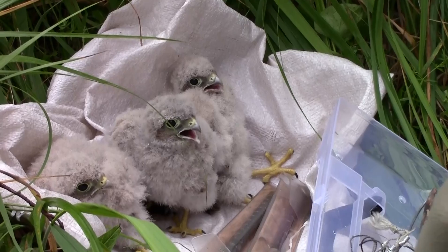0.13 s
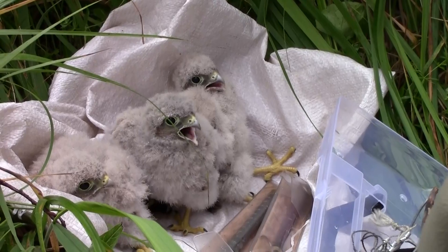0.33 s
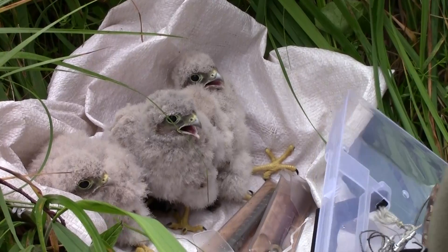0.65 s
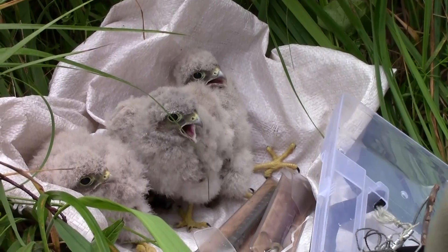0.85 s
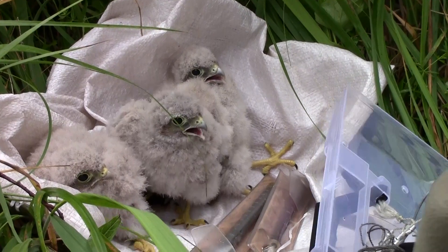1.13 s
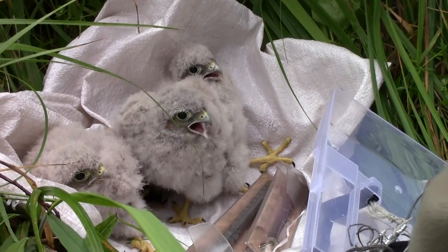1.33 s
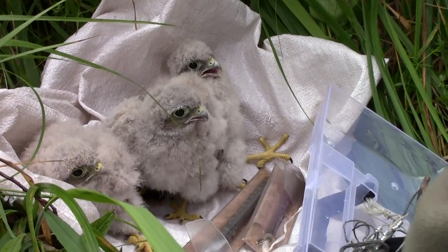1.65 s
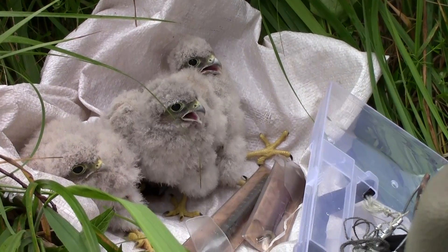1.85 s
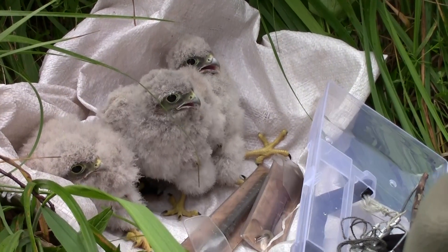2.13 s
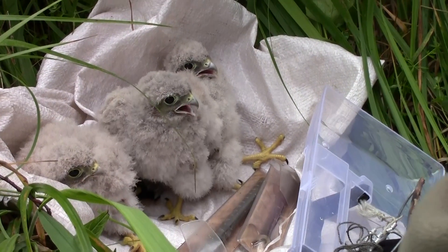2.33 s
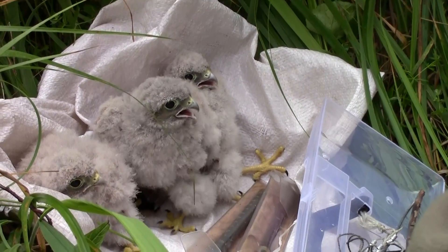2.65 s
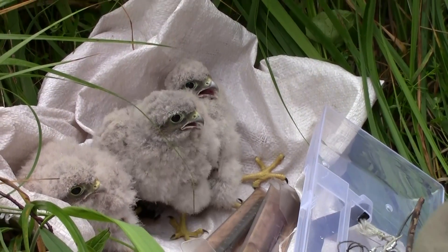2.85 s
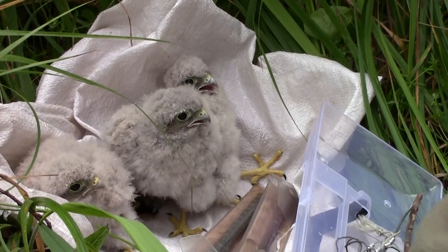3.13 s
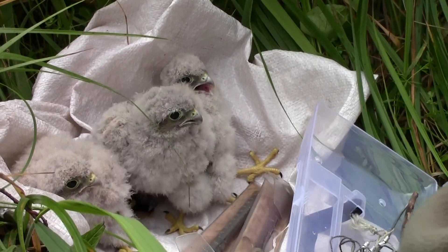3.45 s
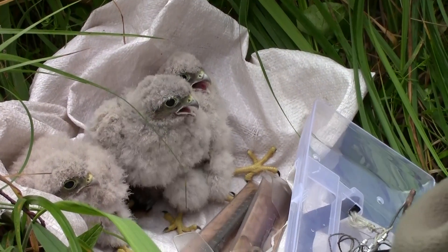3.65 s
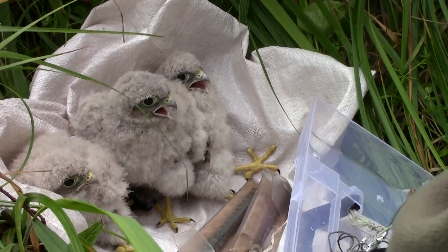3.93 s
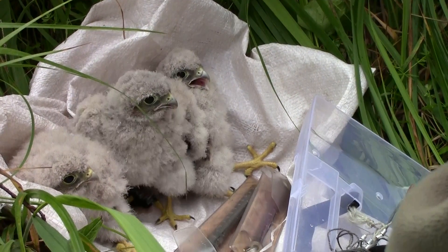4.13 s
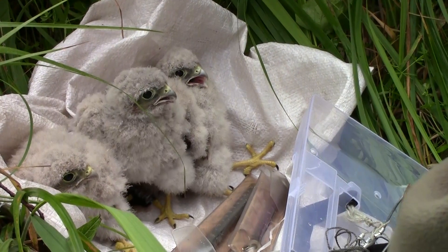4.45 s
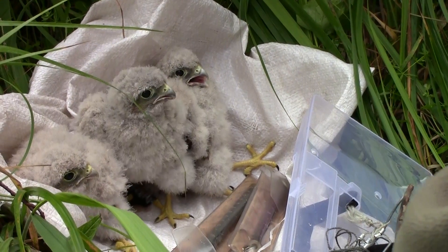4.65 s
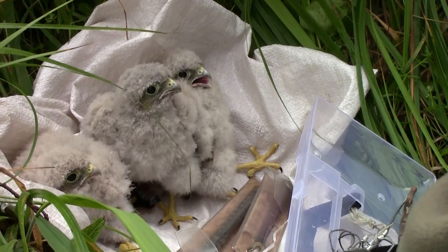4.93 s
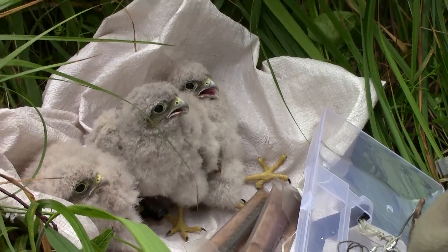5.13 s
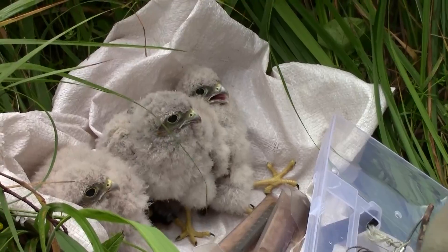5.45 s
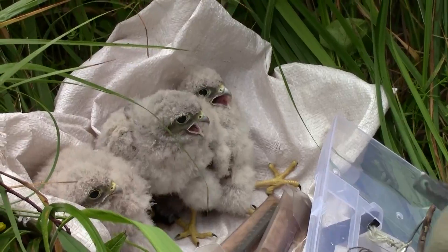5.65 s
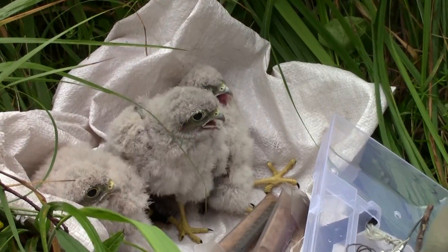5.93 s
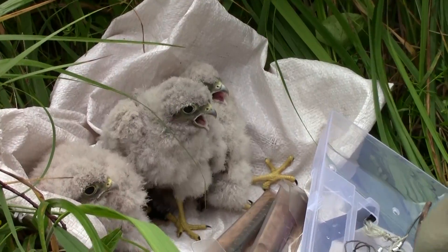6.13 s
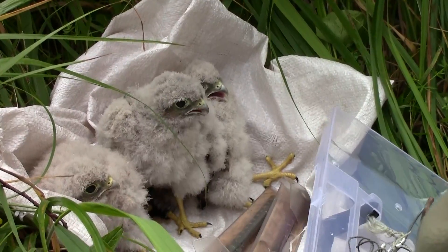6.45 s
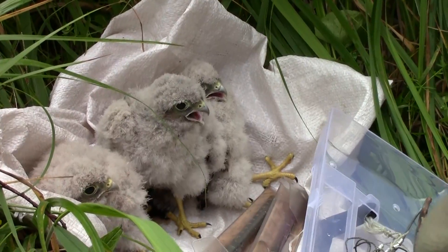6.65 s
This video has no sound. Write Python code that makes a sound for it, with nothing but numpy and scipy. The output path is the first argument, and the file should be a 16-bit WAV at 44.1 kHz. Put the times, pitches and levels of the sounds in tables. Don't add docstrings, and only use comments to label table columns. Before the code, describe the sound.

Outdoors in grass, heard close in stereo, a falcon chick screams from about 0.15 s to the end, roughly four times a second. Each shriek lasts about a tenth of a second: a clear swelling start, a rough cracked middle, a loud bright leap near 2 kHz with strong overtones, then a quick collapse. A second chick cries more softly and huskily between 0.3 and 0.95 s, again from 4.2 to 5.55 s, and faintly near 6.1 s. Light plastic ticks and scrapes occur around 0.7-0.9 and 2.5 s, a firm knock at 3.2 s, a duller bump at 3.5 s, and the busiest clatter at 5.6-5.9 s. Small metal rings clink at 2.6 s, brightly at 4.0-4.3 s, and at 5.6-5.85 s, with fine chain hiss over cloth. Distant traffic hum and light low wind continue, gusting slightly around 5.1 s; a faint engine drone enters near 5.9 s.

```python
import sys
import numpy as np
from scipy import signal
from scipy.io import wavfile
from scipy.ndimage import uniform_filter1d

SR = 44100
rng = np.random.default_rng(int(sys.argv[2]) if len(sys.argv) > 2 else 0)


def to_wav(sig):
    pcm = np.clip(np.atleast_2d(sig), -1, 1) * 32767
    pcm = np.round(pcm).astype(np.int16)
    wavfile.write(sys.argv[1], SR, pcm.T)


def volts_from_decibels(level):
    exponent = np.asarray(level, float) / 20
    return 10 ** exponent


N = 299880
TIME = np.arange(N) / SR
LEFT_RIGHT = np.array([[1], [-1]])


def band(x, lo_hz, hi_hz, order=2):
    return signal.sosfilt(signal.butter(order, [lo_hz, min(hi_hz, .49 * SR)], "band", fs=SR, output="sos"), x)


def unit(x):
    return x / np.sqrt(np.mean(x ** 2))


def walk(rate_hz):
    return unit(signal.sosfilt(signal.butter(2, rate_hz, fs=SR, output="sos"), rng.standard_normal(N)))


def colour_db(table, hz):
    f, db = np.transpose(table)
    return np.interp(np.log(hz), np.log(f), db)


def arch(t0, t1, first, top, last, order=(10, 7), count=17):
    u = np.linspace(0, 1, count)
    return t0 + u * (t1 - t0), top + (first - top) * (1 - u) ** order[0] + (last - top) * u ** order[1]


def controls(points, smooth_s):
    s, *columns = np.transpose(points)
    return [uniform_filter1d(np.interp(TIME, s, c), int(smooth_s * SR)) for c in columns]


def ring(hz, db, t60_s, t):
    return volts_from_decibels(db - 60 * t / t60_s) * np.sin(2 * np.pi * hz * t)


def add(out, s, x):
    i = int(s * SR)
    out[i:i + len(x)] += x[:N - i]


def chick():
    # start_s, crack_s, reached_hz, reached_db
    heads = [(0.147, 0.172, 1697, -12), (0.396, 0.422, 1686, -11.5), (0.646, 0.687, 1704, -9.5),
             (0.887, 0.916, 1836, -5), (1.124, 1.147, 1788, -8.5), (1.36, 1.384, 1757, -10),
             (1.593, 1.617, 1824, -7), (1.833, 1.853, 1657, -15), (2.086, 2.107, 1825, -8),
             (2.332, 2.353, 1787, -12), (2.57, 2.598, 1768, -10), (2.784, 2.806, 1883, -5),
             (3.029, 3.049, 1652, -14.5), (3.305, 3.339, 1860, -7), (3.574, 3.602, 1792, -11),
             (3.799, 3.814, 1835, -14.5), (4.025, 4.062, 1885, -5.5), (4.301, 4.349, 1810, -6),
             (4.571, 4.611, 1797, -7.5), (4.826, 4.874, 1865, -5.5), (5.078, 5.099, 1845, -6),
             (5.319, 5.354, 1790, -8), (5.625, 5.672, 2040, -3.5), (5.877, 5.938, 2112, -3),
             (6.148, 6.174, 1825, -8.5), (6.389, 6.411, 1817, -12.5), (6.675, 6.723, 1750, -11)]
    # landing_hz, landing_db, before_leap_hz, before_leap_db
    cracks = [(1665, -14, 1780, -8), (1606, -16.5, 1770, -7.5), (1663, -11.5, 1735, -8),
              (1698, -15.5, 1820, -8.5), (1657, -16.5, 1800, -6.5), (1690, -15, 1815, -6.5),
              (1695, -15.5, 1810, -9), (1660, -16.5, 1880, -7), (1689, -15, 1795, -10),
              (1670, -16.5, 1810, -8), (1710, -15.5, 1785, -12), (1620, -16, 1725, -13.5),
              (1555, -19.5, 1805, -9), (1735, -14, 1725, -11.5), (1680, -14, 1825, -10.5),
              (1750, -17, 1825, -11.5), (1778, -13, 1775, -13), (1675, -14, 1785, -12.5),
              (1618, -15, 1695, -15), (1790, -10.5, 1800, -9), (1845, -4, 2045, -5.5),
              (1637, -15.5, 1600, -11), (1847, -16, 1960, -11), (1928, -11, 1700, -9),
              (1670, -16.5, 1800, -11.5), (1597, -17, 1795, -13), (1695, -16.5, 1705, -16)]
    # start_s, end_s, top_hz, crack_half_pitch_db
    crowns = [(0.193, .232, 1999, -13.5), (0.45, 0.481, 2000, -10), (0.704, 0.733, 1957, -18),
              (0.944, 0.982, 2121, -6.5), (1.177, 1.208, 2042, -10.5), (1.415, 1.443, 2117, -10.5),
              (1.638, 1.68, 2097, -10), (1.887, 1.923, 2143, -10), (2.143, 2.177, 2105, -8),
              (2.382, 2.411, 2069, -8), (2.611, 2.652, 2070, -6), (2.827, 2.876, 2140, -5.5),
              (3.084, 3.121, 2090, -13), (3.361, 3.406, 2117, -7), (3.628, 3.662, 2080, -7.5),
              (3.851, 3.891, 2165, -11), (4.072, 4.118, 2143, -11), (4.37, 4.402, 2021, -6),
              (4.627, 4.669, 2035, -4), (4.884, 4.926, 2098, -16), (5.136, 5.165, 2065, -45),
              (5.37, 5.409, 2047, -7.5), (5.687, 5.716, 2190, -19), (5.944, 5.971, 2111, -21),
              (6.212, 6.247, 2131, -9), (6.433, 6.478, 2113, -4.5), (6.734, 6.763, 1990, -3.5)]
    # onset_hz, onset_db, crown_db, beak_treble_db
    effort = [(1603, -16, -7, -2.5), (1670, -13.5, -6.5, -3), (1595, -17, -6, -5), (1840, -12, -6.5, 0.5),
              (1745, -13.5, -7, -3.5), (1730, -13.5, -7, -3.5), (1775, -11, -6.5, -3),
              (1630, -18, -6, -2.5), (1797, -11.5, -6, -2.5), (1760, -13, -6, -5), (1750, -15, -6, -5),
              (1860, -12.5, -6, -1.5), (1636, -15.5, -6, -4.5), (1750, -15.5, -6, -2),
              (1765, -14.5, -6, -5), (1765, -16, -7, 0), (1840, -11, -6.5, -2), (1750, -17, -6, -5.5),
              (1785, -14.5, -6, -4.5), (1720, -18, -6, -3), (1790, -11.5, -6, -4.5), (1740, -16, -6, -4.5),
              (1775, -16, -8, -0.5), (1735, -19, -7, -2), (1805, -12, -6.5, -2), (1795, -13.5, -6.5, -2.5),
              (1705, -19.5, -6.5, -4)]
    # partial_hz, level_db
    throat = [(800, -23.5), (1700, -16.5), (2100, -15.5), (2700, -16.5), (3400, 1), (4350, 0.5),
              (4750, -12), (5200, -10.5), (6300, -19), (7300, -14), (8400, -9), (10500, -21.5),
              (12500, -30), (14600, -35), (17000, -78)]
    leap_hz, droop, crack_rough = 189.8, 0.94, 1.35
    rows = []  # s, hz, db, half_db, rough, dull_db, air_db
    for head, crown, middle, push in zip(heads, crowns, cracks, effort):
        start, crack_s, head_hz, head_db = head
        t0, t1, top_hz, half_db = crown
        land_hz, land_db, leave_hz, leave_db = middle
        onset_hz, onset_db, crown_db, beak_db = push
        crack = np.clip((half_db + 30) / 22, .2, 1.2)
        fall = np.clip((half_db + 30) / 18, 0, 1)
        end_hz = droop * top_hz
        rows += [
            (start - .001, .88 * onset_hz, -75, -30, .6, -22, -20),
            (start + 0.00101, .92 * onset_hz, onset_db - 13, -30, .6, -22, -20),
            (start + .004, .975 * onset_hz, onset_db - 4, -26, .6, -20, -24),
            (start + .009, onset_hz, onset_db, -24, .55, 0.77 * onset_db + beak_db, -25),
            (start + .55 * (crack_s - start), .1 * onset_hz + .9 * head_hz, head_db - 1.2, -23, .55,
             1.1 * head_db + beak_db, -27),
            (crack_s - .003, head_hz, head_db, -22, .4, 1.8 * head_db + beak_db, -27)]
        rows += [
            (crack_s, .98 * land_hz, land_db - 3 * crack, half_db + 2, crack, -14, -26 + 11 * crack),
            (crack_s + .003, land_hz, land_db, half_db + 2, crack_rough * fall, -12, -30 + 11 * crack),
            (.4 * crack_s + .6 * t0, .62 * land_hz + .38 * leave_hz, .5 * (land_db + leave_db), half_db + 2,
             crack_rough * fall, -11, -30 + 12 * crack),
            (t0 - .001, leave_hz, leave_db, half_db, crack, -9, -30 + 12 * crack)]
        first_hz = min(leave_hz + leap_hz, top_hz)
        times, pitch = arch(t0 + .0017, t1, first_hz, top_hz, end_hz, order=(11, 10))
        for s, hz in zip(times, pitch):
            rows.append((s, hz, crown_db + 0.49, -30, .4, beak_db + 2.13 - 90 * (1 - hz / top_hz), -27))
        rows += [
            (t1 + .002, .95 * end_hz, crown_db - 9, -12, 1.8, -18, -15),
            (t1 + .012, .76 * end_hz, crown_db - 17, -8, 2.2, -22, -11),
            (t1 + .022, .56 * end_hz, -75, -11, 2.2, -22, -11)]
    hz, db, half_db, rough, dull_db, air_db = controls(sorted(rows), .0018)
    return syrinx(hz, db, half_db, rough, throat, dull_db, air_db)


def mate():
    # start_s, end_s, top_hz, level_db
    calls = [(0.314, 0.409, 2020, -17.5), (.495, 0.565, 2007, -19.5), (0.848, 0.949, 2036, -18.5),
             (4.175, 4.286, 2027, -17), (4.483, 4.583, 2205, -26.5), (4.677, 4.749, 2153, -25),
             (4.994, 5.083, 2072, -20.5), (5.162, 5.241, 2140, -26.5), (5.289, 5.366, 1965, -26),
             (5.464, 5.553, 2166, -25.5), (6.098, 6.22, 2168, -28.5)]
    # partial_hz, level_db
    mate_throat = [(1500, -29.5), (2200, -7), (3200, 0), (4200, 3), (5500, -14.5), (8000, -14),
                   (10500, -20), (12000, -34), (17000, -52)]
    rows = []  # s, hz, db, dull_db
    for t0, t1, top_hz, call_db in calls:
        first_hz, last_hz = .8 * top_hz, .82 * top_hz
        times, pitch = arch(t0, t1, first_hz, top_hz, last_hz, order=(4, 6))
        swell_db = arch(t0, t1, -20.0, 0.86, -19, order=(2, 4))[1]
        rows.append((t0 - .01, first_hz, -75, 0))
        for s, hz, db in zip(times, pitch, call_db + swell_db):
            rows.append((s, hz, db, 1.4 * (call_db + 17.5) + 0.5 * (db - call_db)))
        rows.append((t1 + 0.01296, last_hz - 120, -75, -12))
    hz, db, dull_db = controls(rows, .003)
    rough = 0.8 - 0.22 * dull_db.clip(-9, 0)
    return syrinx(hz, db, 0 * hz - 27, rough, mate_throat, dull_db, -22.5 - 0.49 * dull_db)


def syrinx(hz, db, half_db, rough, throat, dull_db, air_db, jitter=0.00815, shimmer_db=1.5):
    on = db > -70
    wander = 1 + jitter * rough * walk(481) + 0.00304 * walk(49.3)
    half_phase = (np.pi * np.cumsum(hz * wander) / SR)[on]
    wobble_db, tone = shimmer_db * walk(178), np.zeros(N)
    patch_db = 3.1 * walk(55)
    for k in range(1, 19):
        part_hz = hz[on] * k / 2
        part_db = colour_db(throat, part_hz) + (half_db[on] if k % 2 else 0)
        least = 0.45 * (k == 6) * (half_db[on] < -19)
        part_db += dull_db[on] * np.clip(part_hz / 4000 - 1.2, least, 1.3)
        part_db += (rough * np.roll(wobble_db, 999 * k) + (k > 4) * np.roll(patch_db, 7919 * k))[on]
        tone[on] += volts_from_decibels(part_db) * (part_hz < 17000) * np.sin(k * half_phase + rng.uniform(0, 2 * np.pi))
    noise = rng.standard_normal(N)
    air = unit(band(noise, 3560, 5080)) + volts_from_decibels(-5.5) * unit(band(noise, 5500, 8000))
    air += volts_from_decibels(-5.5 + 4.5 * walk(71)) * unit(band(noise, 8900, 9910))
    air += volts_from_decibels(-39) * unit(band(noise, 460, 4200)) + volts_from_decibels(-17.5) * unit(band(noise, 7000, 15800))
    return volts_from_decibels(db) * on * (np.sqrt(2) * tone + volts_from_decibels(air_db + 4.3 * walk(63)) * air)


def box():
    # start_s, level_db, pitch_hz
    thuds = [(.204, -22, 1090), (0.826, -19.5, 800), (.861, -18, 850), (1.271, -30, 596),
             (1.951, -29, 1063), (2.732, -18.5, 1473), (3.164, -2.5, 952), (3.484, -15.5, 239.8),
             (3.485, -13.5, 602), (3.497, -22, 1100), (3.515, -20, 1297), (3.506, -14.5, 863),
             (5.606, -14, 1102), (5.656, -8.5, 904), (5.671, 0.5, 546), (5.746, -6, 554),
             (5.787, -11.5, 757), (5.797, -9, 815), (5.813, .5, 689), (5.853, -12.5, 872),
             (5.875, -7.5, 532), (6.058, -29.5, 932), (6.315, -20.5, 628), (6.347, -22.5, 543)]
    # start_s, level_db, pitch_hz
    clacks = [(.048, -31, 690), (0.686, -20.5, 537), (.915, -28, 903), (1.048, -26, 544),
              (2.2135, -15, 2900), (2.214, -19, 1500), (2.501, -16.5, 1468), (2.522, -15, 1405),
              (2.556, -29, 740), (2.606, -24.5, 691), (3.181, -10, 952), (3.196, -23, 942),
              (3.21, -17, 963), (3.224, -33, 950), (3.24, -17, 950), (3.244, -19.5, 1040),
              (3.284, -21.5, 1020), (4.516, -28.5, 834), (5.616, -12.5, 890), (5.626, -11, 1383),
              (5.706, -14.5, 1230), (5.777, -24, 903), (5.805, -20, 1000), (5.827, -14, 830),
              (5.846, -20, 1096), (5.839, -12, 1470), (5.864, -14, 887)]
    # start_s, end_s, level_db
    scrapes = [(0.017, 0.065, -46), (0.651, 0.714, -32.5), (0.8, 0.953, -35), (1.364, 1.421, -32),
               (1.95, 2.013, -34), (6.521, 6.565, -52), (2.492, 2.641, -43), (2.721, 2.749, -55),
               (3.166, 3.312, -34), (3.484, 3.531, -28.5), (4.143, 4.323, -46), (4.441, 4.805, -40),
               (5.588, 5.722, -25), (5.777, 5.889, -26), (6.016, 6.079, -44), (6.298, 6.361, -48)]
    thud_snap_db, clack_snap_db, scrape_snap_db = -22, -2, -7.5
    out, t = np.zeros(N), np.arange(1500) / SR
    hits = [(*row, thud_snap_db) for row in thuds] + [(*row, clack_snap_db) for row in clacks]
    for t0, t1, db in scrapes:
        luck = rng.random((40, 3))[:int((t1 - t0) * 170)]
        for when, pitch, size in luck:
            hits.append((t0 + when * (t1 - t0), db - 2.1 * np.log(size), 520 * 3 ** pitch, scrape_snap_db))
    s, db, hz, snap_db = np.transpose(hits)[:, :, None]
    knocks = volts_from_decibels(db - 2.0) * knock(hz, snap_db, rng.standard_normal((len(hits), 1500)), t)
    for at, x in zip(s[:, 0], knocks):
        add(out, at - .0005, x)
    return band(out, 357, 17000, order=2) + 0.41 * band(out, 108, 413)


def knock(hz, snap_db, grit, t):
    # pitch_ratio, level_db, t60_s
    modes = [(0.999, 3.5, 0.021), (1.886, -7.5, 0.0077), (0.73, -11, 0.0068)]
    body = sum(ring(hz * ratio, db, t60_s, t) for ratio, db, t60_s in modes)
    slow_decay, fast_decay = volts_from_decibels(-60 * t / 0.03), volts_from_decibels(-60 * t / 0.007)
    snap = volts_from_decibels(snap_db) * (ring(3090, 0, 0.012, t) + 2.0 * band(grit, 720, 4200) * slow_decay)
    rattle = 1.78 * band(grit, 460, 1760) * slow_decay
    rattle = rattle + volts_from_decibels(snap_db - 4) * band(grit, 3800, 7400) * fast_decay
    return (body + snap + rattle) * (1 - np.exp(-t / 0.00042))


def jingle():
    # start_s, level_db, loudest_hz
    touches = [(0.035, -36, 11400), (0.8247, -32.5, 9340), (1.0747, -36, 7100), (1.31, -37, 9440),
               (1.9784, -37, 6390), (2.2133, -54, 6080), (2.5045, -33, 6156), (2.5215, -27.5, 6880),
               (2.5765, -18, 9380), (2.686, -41, 6310), (2.7357, -31, 8800), (2.7693, -28, 8780),
               (3.1643, -30, 8750), (3.182, -24, 8730), (3.276, -33, 11400), (3.504, -32, 6425),
               (3.9527, -32, 7580), (4.0399, -10, 7570), (4.1806, -18.5, 10940), (4.213, -11.5, 11210),
               (4.289, -23, 11110), (4.4583, -34.5, 11430), (4.5135, -27.5, 11320), (4.735, -36, 6460),
               (4.7686, -33, 11270), (5.5492, -47, 6250), (5.5638, -27, 11200), (5.5925, -19.5, 8870),
               (5.745, -35, 7850), (5.786, -37, 14050), (5.8062, -18, 10360), (5.8135, -19.5, 7890),
               (5.849, -20.5, 10450)]
    # pitch_hz, level_db, t60_s
    ring_modes = [(4600, -10, 0.1), (6250, -9, 0.08), (7450, -14.5, 0.27), (7840, -5, .1),
                  (8780, -3.5, 0.073), (9400, -13, 0.17), (10530, -7, 0.24), (11400, -8, .06),
                  (14050, -17, .15)]
    out, t = np.zeros(N), np.arange(9000) / SR
    for (s, db, hz), luck in zip(touches, rng.standard_normal((len(touches), 9000))):
        modes = 0
        for k, (mode_hz, mode_db, t60_s) in enumerate(ring_modes):
            modes = modes + ring(mode_hz * (1 + 0.00373 * luck[k]), mode_db - 5 + 6 * luck[k + 20], t60_s, t)
        tick = 1.4 * band(luck, 0.34 * hz, 1.5 * hz) * volts_from_decibels(-60 * t / 0.034)
        tick += 0.89 * band(luck, 0.92 * hz, 1.08 * hz) * volts_from_decibels(-60 * t / 0.37)
        add(out, s, volts_from_decibels(db - 8.5) * (ring(hz, 4.7, 0.11, t) + modes + tick))
    return out


def rustle():
    # start_s, end_s, level_db
    drags = [
        (.89, .95, -44),
        (2.569, 2.62, -40),
        (4.03, 4.07, -36),
        (4.17, 4.3, -40),
        (4.495, 4.64, -47),
        (4.755, 4.79, -44),
        (5.592, 5.731, -34),
        (5.801, 5.9, -38.5),
    ]
    swell = 0
    for t0, t1, db in drags:
        swell = swell + volts_from_decibels(db) * np.sin(3.14 * np.clip((TIME - t0) / (t1 - t0), 0, 1)) ** .6
    grit = rng.standard_normal(N) * volts_from_decibels(6.4 * walk(150))
    hiss = unit(band(grit, 9800, 12400)) + 0.68 * unit(band(grit, 7400, 10400))
    return swell * (hiss + .35 * unit(band(grit, 12500, 15000)))


def field(x):
    t60_s, lag_s, level_db, patch_db, sway, earlier_s = .48, 0.042, -27.5, 1.5, 0.5, .29
    t = np.arange(int(.6 * SR)) / SR
    decay = volts_from_decibels(-60 * t / t60_s) * np.clip(t / lag_s, 0, 1) ** 2
    mid, side = rng.standard_normal((2, len(t))) * decay * volts_from_decibels(patch_db * walk(30)[:len(t)])
    tails = band(np.array([mid + 0.22 * side, mid - 0.12 * side]), 3520, 4500, order=1)
    tails += 0.41 * band(np.array([mid, mid + 0.3 * side]), 5800, 9000, order=1)
    tails *= volts_from_decibels(level_db) / np.sqrt(np.sum(mid ** 2))
    lead = int(earlier_s * SR)
    wet = signal.fftconvolve(np.r_[x[:lead], x][None], tails, axes=1)
    return wet[:, lead:lead + N] * (1 + sway * walk(260)) / np.hypot(1, sway)


def far_hum():
    # band_hz, level_db_per_hz
    hum_colour = [(150, -9), (280, -10.5), (460, -9.5), (820, -3), (1600, -15), (2200, -12), (3700, -19),
                  (6000, -19), (9000, -31), (12000, -24), (16000, -44)]
    hum, stir = 0, walk(16.3)
    for hz in 160 * 2 ** np.arange(0, 6.6, .5):
        mid, side = band(rng.standard_normal((2, N)), hz / 1.264, hz * 1.114)
        apart = np.clip((170 / hz) ** 2 + (hz / 14000) ** 2, .06, 1)
        level_db = colour_db(hum_colour, hz) + 2.0 * walk(42) + 3.4 * min(2500 / hz, 1) * stir
        hum = hum + volts_from_decibels(level_db) * (mid + apart * side * LEFT_RIGHT)
    hum = hum / np.sqrt(np.mean(band(hum[0], 160, 2300) ** 2))
    return volts_from_decibels(-48 + 1.5) * hum


def far_engine():
    fade = np.clip(TIME - 5.85, 0, .2) / 0.2
    return volts_from_decibels(-51.5 + 4.4 * walk(6.7)) * fade * np.sin(2 * np.pi * 490 * TIME + 0.86 * walk(13.6))


def wind():
    # time_s, level_db
    gust = [
        (0, -54),
        (4.7, -52.5),
        (5.2, -50.5),
        (6.8, -51),
    ]
    # centre_s, level_db
    puffs = [
        (.62, 0),
        (3.5, 5),
        (5.08, 7.5),
        (5.22, 7),
        (5.65, 3),
        (6.12, -8),
        (6.22, 0),
    ]
    buffet, common = band(rng.standard_normal((2, N)), 40, 104, order=1)
    air = unit(1.34 * buffet * LEFT_RIGHT + common * np.array([[.8], [1.1]]))
    push = 1 + sum(volts_from_decibels(db) * np.exp(-((TIME - at) / 0.027) ** 2) for at, db in puffs)
    return push * air * volts_from_decibels(np.interp(TIME, *np.transpose(gust)) + 3.0 * walk(1.7))


def scene():
    birds, rings = chick() + mate(), jingle() + rustle()
    things = box() + rings
    slope = np.gradient(birds)
    voices = np.array([volts_from_decibels(-0.3) * birds + 0.071 * slope, volts_from_decibels(0.03) * birds - 0.066 * slope])
    handled = things * volts_from_decibels(0.2 * LEFT_RIGHT) + 0.18 * np.gradient(rings) * LEFT_RIGHT
    return voices + handled + field(birds + things) + far_hum() + far_engine() + wind()


def band_limit(x):
    return signal.sosfilt(signal.butter(12, 16440, fs=SR, output="sos"), x)


def record(dry):
    thud = 0.006 * band(dry ** 2, 3, 110, order=1)
    bent = np.tanh(0.65 * (dry + thud)) / 0.82
    top_cut = signal.ellip(10, .2, 70, 15980, fs=SR, output="sos")
    return band_limit(signal.sosfilt(top_cut, bent))


dry = scene()
out = record(dry)
to_wav(out)
```